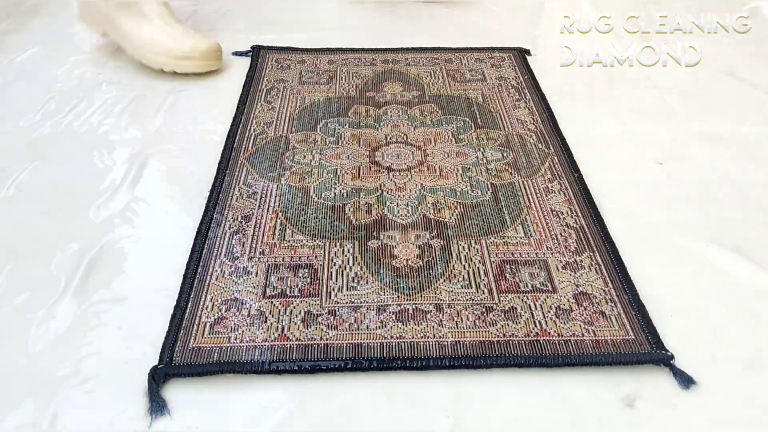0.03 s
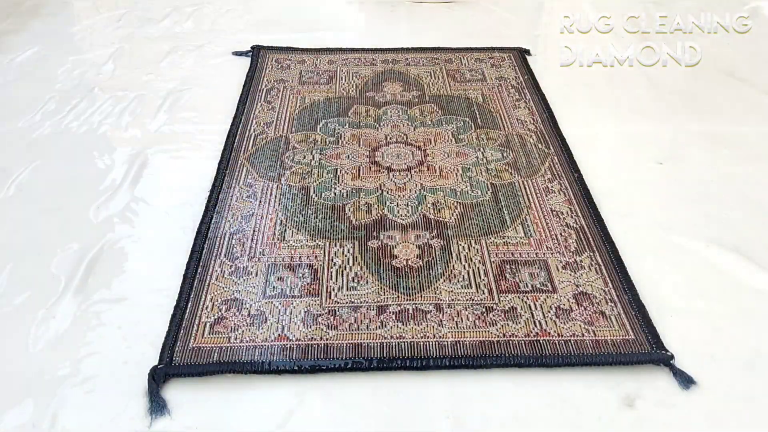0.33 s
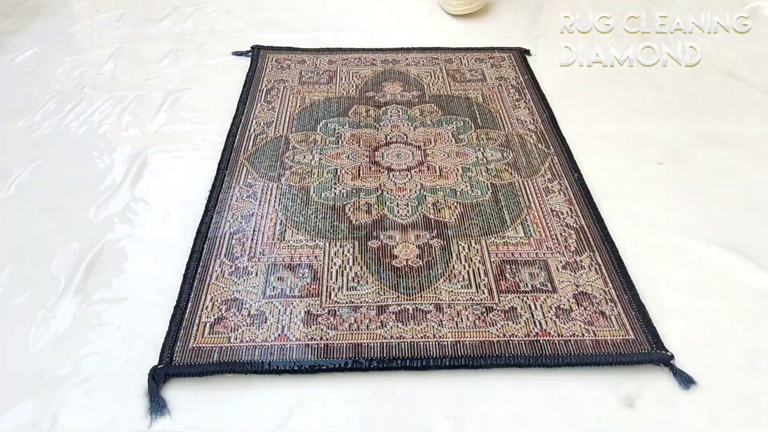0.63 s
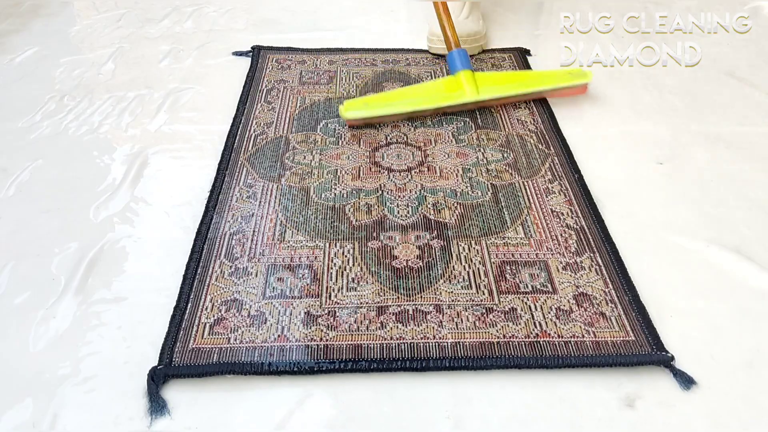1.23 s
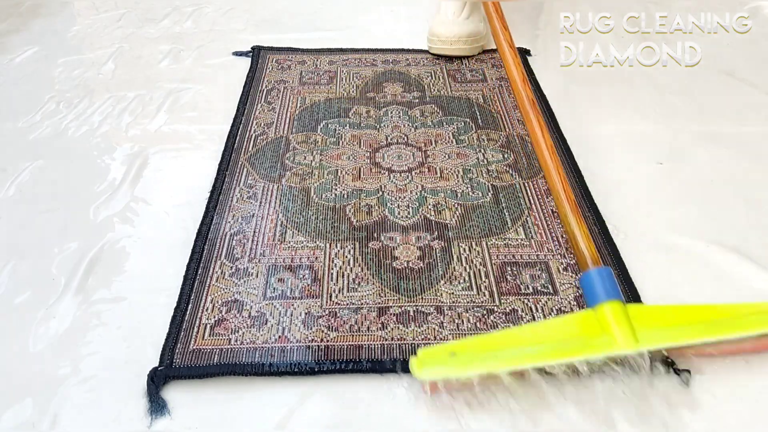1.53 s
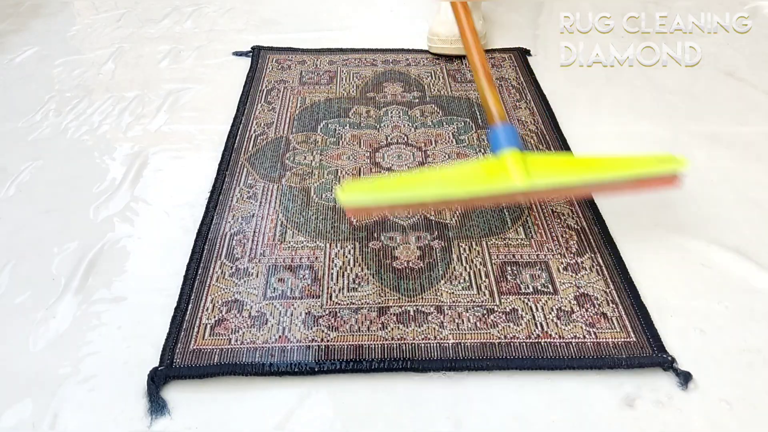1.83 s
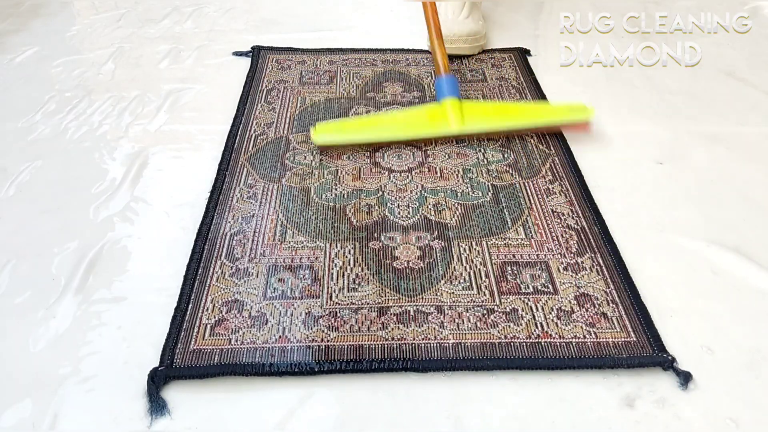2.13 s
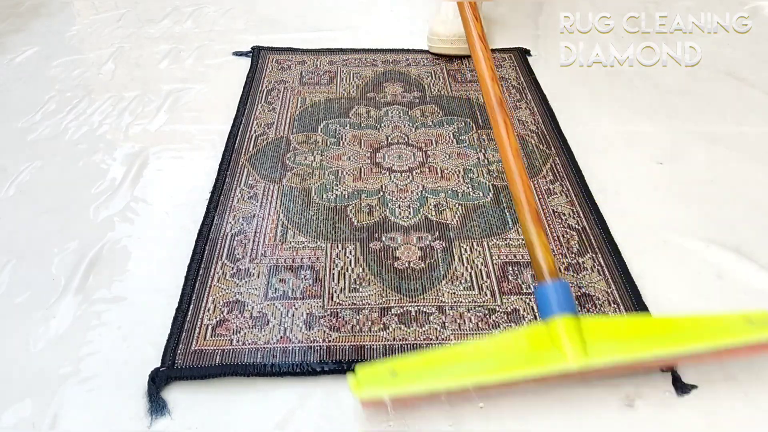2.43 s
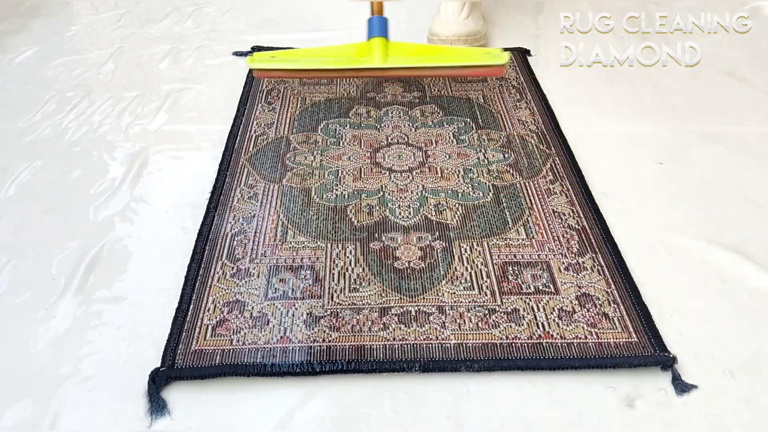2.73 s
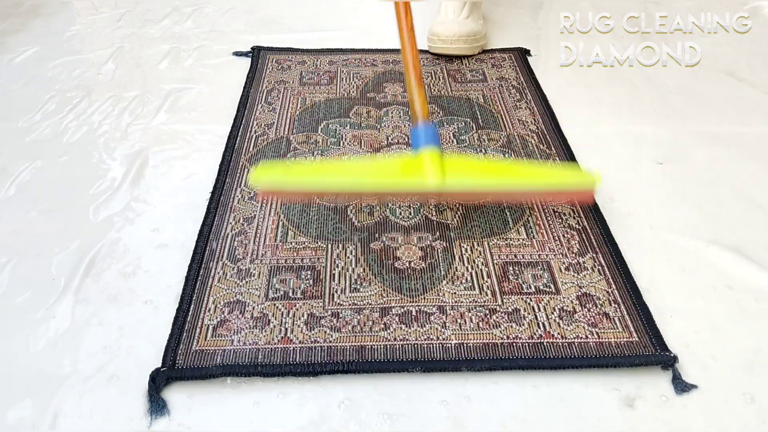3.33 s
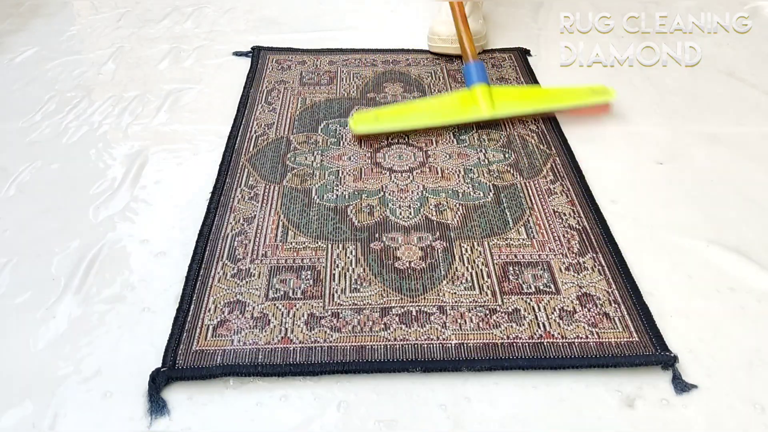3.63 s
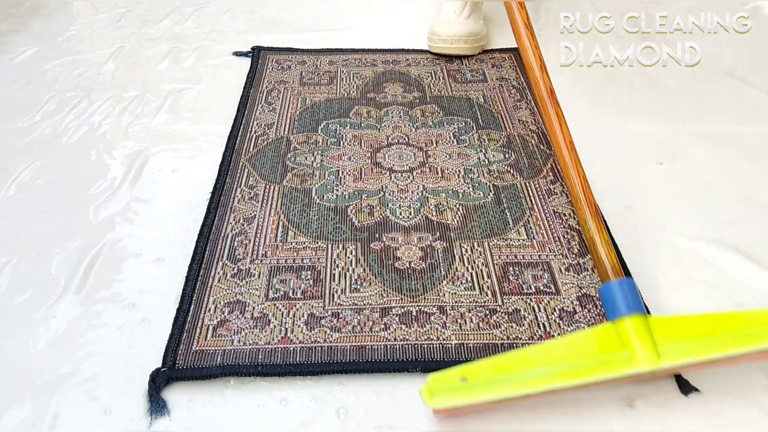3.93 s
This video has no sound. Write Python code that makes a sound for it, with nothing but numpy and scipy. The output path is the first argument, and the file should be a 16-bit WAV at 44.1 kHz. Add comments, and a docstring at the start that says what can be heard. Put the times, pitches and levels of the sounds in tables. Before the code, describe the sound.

Wet, hissy swipes of a squeegee over a soaked rug, with light taps and spattering water.

```python
"""A rubber squeegee works a wet rug on a wet floor in a hard-walled room, while a spinning machine hums.
The blade lands with wet slaps and pushes at 0.9 s and 1.8 s: it flicks the wet pile (hiss), its rubber
slips (rasp) and its hollow head drones. After each push, water drips and spatters on the floor.
At 2.5 s it is pulled back, scraping roughly, and knocks at the rug's edge at 2.8 s.
One more slap starts the last push at 3.3 s."""
import sys
import numpy as np
from scipy import signal
from scipy.fft import rfft, irfft
from scipy.io import wavfile

SR = 44100
rng = np.random.default_rng(int(sys.argv[2]) if len(sys.argv) > 2 else 0)


def persist_wave(psi):
    """Save psi, clipped to +-1, as 16-bit WAV."""
    counts = np.round(np.clip(psi, -1, 1) * 32767).astype(np.int16)
    wavfile.write(sys.argv[1], SR, np.atleast_2d(counts).T)


N = 176400
TIME = np.arange(N) / SR
FLICKS_PER_S, FLICK_SPREAD_DB = 14000, 3.5  # "spread" is how much the snaps vary in size
SLIPS_PER_S, SLIP_SPREAD_DB = 4000, 0.5


# How each stroke swells and fades, before its own gains: t/s, hiss level/dB, rasp level/dB
PUSH_1 = [(0.915, -56, -53), (0.943, -35, -43), (1.019, -29.5, -41), (1.119, -26.5, -36.5),
          (1.201, -24.5, -37), (1.317, -35, -38.5), (1.361, -28.5, -45.5), (1.47, -52, -56)]
PUSH_2 = [(1.81, -50, -50), (1.816, -36, -45), (1.872, -25.5, -38), (1.986, -21.5, -33.5),
          (2.06, -22, -38.5), (2.07, -24, -33.5), (2.13, -45, -52.5), (2.15, -38, -54)]
PULL = [(2.54, -37.5, -45), (2.586, -26.5, -34.5), (2.616, -26, -26), (2.688, -23, -23.5),
        (2.8, -22.5, -28), (2.81, -23.5, -26.5), (2.822, -22, -29), (2.848, -40, -41.5), (2.88, -41.5, -46)]
PUSH_3 = [(3.295, -41, -43.5), (3.333, -29, -38.5), (3.413, -23, -34.5), (3.523, -18.5, -35.5),
          (3.601, -25.5, -44.5), (3.625, -34, -40), (3.69, -53, -68)]
# Tone of the rubber when pushed and when pulled: f/Hz, level/dB
PUSH_RASP = [(150, -28.5), (290, 3.5), (400, -7.5), (750, 1), (1200, 2), (1650, 1), (2400, 1.5),
             (3100, -0.5), (4100, -1), (7000, -5.5), (15000, -9)]
PULL_RASP = [(150, -29), (250, -25), (345, -6), (750, -5), (1000, -1.5), (1400, -2), (1750, -5),
             (2150, -3.5), (2800, -6), (3300, -14), (3900, -15.5), (4800, -9.5), (7000, -37), (12000, -30)]
def strokes():
    """Push, push, pull back, push, each with a fine, patchy treble crackle of short random pings."""
    crackle = amp(-9.5) * pings(per_s=68, low_hz=4780, high_hz=15240, width_hz=130, count=22)
    return (stroke(PUSH_1, PUSH_RASP, crackle, hiss_db=-7.5, rasp_db=3.0, left_db=0.5, drift_db=-0.9)
            + stroke(PUSH_2, PUSH_RASP, crackle, hiss_db=-4.5, rasp_db=3.5, left_db=0.2, drift_db=0.4)
            + stroke(PULL, PULL_RASP, crackle, hiss_db=-7.0, rasp_db=-1.0, left_db=0.4, drift_db=-0.6)
            + stroke(PUSH_3, PUSH_RASP, crackle, hiss_db=-5.5, rasp_db=1.5, left_db=0.75, drift_db=0.0))


# Tone of the flicked wet fibres and of larger bubbles popping among them: f/Hz, level/dB
PILE_HISS = [(1500, -32), (4200, -9), (5500, -2), (6200, 0.5), (7500, 2.5), (10000, 2), (13000, 0),
             (16000, 1)]
BUBBLE_POPS = [(400, -4.5), (1200, 6.5), (3000, 0), (6000, 27.5), (10000, -5), (16000, -6)]
def stroke(curve, rasp_tone, crackle, hiss_db, rasp_db, left_db, drift_db, fade_s=0.006):
    """The blade flicks wet fibres and pops a few larger bubbles; its rubber slips unevenly."""
    times, *levels = np.transpose(curve)
    contact = np.clip(np.minimum(TIME - times[0], times[-1] - TIME) / fade_s + 1, 0, 1)
    wobble_db = 0.83 * np.interp(TIME, np.arange(N) * 0.012, rng.standard_normal(N))  # new every 12 ms
    pressure = contact * amp(wobble_db)
    hiss, rasp = (pressure * amp(np.interp(TIME, times, level)) for level in levels)
    flicks = unit(colour(clicks(FLICKS_PER_S, FLICK_SPREAD_DB), PILE_HISS))
    pops = amp(-11.5) * unit(colour(clicks(per_s=300, spread_db=7.5), BUBBLE_POPS))
    slips = unit(colour(clicks(SLIPS_PER_S, SLIP_SPREAD_DB), rasp_tone))
    sound = amp(hiss_db) * hiss * (flicks + crackle + pops) + amp(rasp_db) * rasp * slips
    lean_db = left_db + drift_db * np.interp(TIME, [times[0], times[-1]], [0, 1])
    return sound * amp([lean_db, -lean_db])


# Drones where the blade is pressed hardest: peak t/s, f/Hz, level/dB, rise/s, fade/s
HEAD_DRONES = [(.99, 470, -38.5, 0.0094, 0.11), (1.04, 444, -36.5, 0.03, 0.43),
               (1.11, 475, -38.5, 0.037, 0.33), (1.749, 470, -39.5, 0.016, 0.17),
               (1.881, 548, -34.5, 0.036, 0.56), (1.98, 634, -45, 0.1, 0.76),
               (2.662, 396, -30, 0.095, 0.66), (2.78, 415, -26.5, 0.047, 0.22),
               (3.43, 620, -39.5, 0.092, 0.48)]
def drones():
    """The slipping rubber makes the squeegee's hollow head ring."""
    return sum(amp(db) * burst(t, rise, fade) * swarm(hz, width_hz=244)
               for t, hz, db, rise, fade in HEAD_DRONES)


# Water squeezed out under the blade: peak t/s, f/Hz, width/Hz, level/dB, rise/s, fade/s
SQUELCHES = [(1.29, 1130, 400, -38.5, 0.017, 0.19), (1.325, 1460, 650, -39.5, 0.023, 0.08),
             (2.68, 2100, 930, -23, 0.033, 0.25), (2.765, 2150, 950, -27.5, .025, 0.17),
             (3.6, 2240, 1320, -39, 0.037, 0.082)]
def squelches():
    """Small bubbles swarm where the blade presses water out of the rug."""
    return sum(amp(db) * burst(t, rise, fade) * swarm(hz, width)
               for t, hz, width, db, rise, fade in SQUELCHES)


# Wet slaps of blade and boots: t/s, splash level/dB, pat level/dB, rise/s, fade/s, left over right/dB
SLAPS = [(0.598, -46.5, -48, .005, 0.046, 6), (.605, -42, -65, .002, 0.12, 0),
         (.78, -53.5, -53, 0.026, .26, 0), (0.8245, -37.5, -36.5, .001, .022, 5.5),
         (0.8272, -40.5, -44.5, .0005, 0.069, -7), (1.74, -38, -40.5, 0.0072, 0.12, 1),
         (1.7494, -29, -42, 0.0008, 0.028, 5), (1.761, -45, -55, 0.0037, .15, -2),
         (1.815, -42, -47, .002, 0.07, -4), (2.51, -60, -37, .0022, 0.071, -7),
         (2.5168, -35, -29.5, 0.00054, 0.036, 2.5), (2.53, -43, -51, .001, 0.025, 1),
         (2.538, -43, -49, 0.0095, 0.21, -3), (3.2671, -32.5, -40, .0005, 0.018, 1),
         (3.2687, -33.5, -34.5, 0.00067, .02, 13), (3.284, -41, -39.5, 0.0096, 0.1, -5)]
# Tone of the bright splash and of the low pat: f/Hz, level/dB
SPLASH_TONE = [(800, -37), (2500, 8.5), (5000, 12.5), (9000, 7.5), (16000, 3.5)]
PAT_TONE = [(100, 11.5), (280, -4), (460, 7.5), (750, -1), (1300, 4.5), (2800, -1.5), (5000, -14.5),
            (15000, -70)]
def slaps():
    """Each landing is a splash of fine drops over a short hollow pat."""
    splash, pat = np.zeros((2, 2, N))
    for t, splash_db, pat_db, rise, fade, side_db in SLAPS:
        shape = amp([[side_db / 2], [-side_db / 2]]) * burst(t, rise, fade)
        splash += amp(splash_db) * shape
        pat += amp(pat_db) * shape
    drops = unit(colour(clicks(FLICKS_PER_S, FLICK_SPREAD_DB), SPLASH_TONE))
    return splash * drops + pat * unit(colour(noise(N), PAT_TONE))


# Knocks on the head: t/s, level/dB
KNOCKS = [(2.8097, -12), (2.813, -19.5), (2.8292, -26), (2.978, -33)]
# Notes that the head and handle ring with: f/Hz, level/dB added to the knock's, fade/s
HEAD_NOTES = [(81, -16, 0.073), (191, -16.5, 0.14), (327, 1, 0.0065), (485, -5, 0.012), (830, -9.5, 0.027),
              (935, -10, 0.012), (1240, -25, 0.0072), (1450, -20, 0.013), (1663, -13.5, 0.071)]
def knocks():
    """Head and handle ring briefly as the blade snaps over the rug's edge and is swung back."""
    out = np.zeros(N)
    for t, db in KNOCKS:
        for hz, note_db, fade in HEAD_NOTES:
            out += amp(db + note_db) * burst(t, 0.0007, fade) * np.sin(2 * np.pi * hz * (TIME - t))
    return np.array([out, out])


# Showers of drops: peak t/s, level/dB, rise/s, fade/s
SPATTERS = [(.02, -57, 0.039, 0.24), (1.53, -55, 0.05, 0.25), (2.212, -42, 0.045, 0.23),
            (2.94, -49, 0.061, 0.11), (2.989, -37, 0.042, 0.18)]
# Tone of the drops: f/Hz, level/dB
SPATTER_TONE = [(300, -53), (1000, 2), (2500, -6.5), (4500, 7.5), (7000, 4.5), (11000, 0.5), (16000, -1)]
def spatters():
    """Pushed water lands on the floor as many tiny drops."""
    shower = sum(amp(db) * burst(t, rise, fade) for t, db, rise, fade in SPATTERS)
    return shower * unit(colour(clicks(per_s=3800, spread_db=4.5), SPATTER_TONE))


# Single drips: t/s, f/Hz, level/dB, left over right/dB
DRIPS = [(1.4865, 9900, -37.5, 4), (1.5175, 10850, -46, 1), (1.5265, 9040, -38.5, -4),
         (1.5325, 9130, -45, -4), (1.5628, 11100, -48, 6), (1.7245, 10500, -37, -4),
         (2.158, 10600, -41, -3), (2.1707, 8630, -28.5, -5), (2.189, 2890, -25, 2), (2.818, 11000, -35, -2),
         (2.926, 10400, -39, 5)]
def drips(rise_s=0.00018, fade_s=0.0057, glide_per_s=61):
    """Each drip traps a bubble that rings for an instant, rising in pitch."""
    out = np.zeros((2, N))
    for t, hz, db, side_db in DRIPS:
        pitch = hz * (1 + glide_per_s * np.clip(TIME - t, 0, fade_s))
        ring = np.sin(2 * np.pi * (np.cumsum(pitch) / SR + rng.random((2, 1)) / 2))
        out += amp([[db + side_db / 2], [db - side_db / 2]]) * burst(t, rise_s, fade_s) * ring
    return out


def seep():
    """Water seeps from the rug in a faint, bubbling trickle that dies away."""
    return amp(-61 - 2.5 * TIME) * pings(per_s=14, low_hz=546, high_hz=1930, width_hz=70, count=10)


# How fast the machine spins: t/s, speed/(turns per s)
SPIN_SPEED = [(0, 16.25), (.8, 16.37), (1.4, 16.26), (2.1, 16.04), (2.8, 15.95), (4, 16.03)]
# Its hum, one row each for 5, 6, 7... times that speed: level/dB, peak t/s, half length/s
HUMS = [(-64, 2.7, 3), (-56, 0.93, 3.1), (-53, 2.06, 2.1), (-53.5, 2.67, 1.2), (-49, 1.05, 1.35),
        (-61, 1.6, 2.4), (-60, 2.6, 2.2)]
def machine_hum():
    """A spinning machine hums at whole multiples of its speed."""
    turns = np.cumsum(np.interp(TIME, *np.transpose(SPIN_SPEED))) / SR
    return sum(swell(multiple * turns, db, t, half) for multiple, (db, t, half) in enumerate(HUMS, 5))


# Tone of the room's background noise: f/Hz, level/dB
AIR_TONE = [(15, 0), (28, -4), (38, -4), (52, 3), (70, -3), (120, -3.5), (180, -7), (220, -12.5), (280, -9),
            (350, -13), (500, -15), (1000, -23), (2000, -25), (4000, -28.5), (6500, -30), (9500, -35),
            (15000, -35.5)]
def room_tone():
    """Low rumble and faint air, with a deep note that swells near the end."""
    deep_note = swell(50.3 * TIME, db=-47, peak_s=3.76, half_s=0.3)
    return deep_note + amp(-46.5) * unit(colour(noise(N), AIR_TONE, size=16384))


# How long the room takes to fall by 60 dB: f/Hz, fade/s
ROOM_FADE = [(100, 0.36), (400, 0.44), (1500, 0.22), (5000, 0.26), (10000, 0.17), (16000, 0.052)]
def room(x, tail_db, echo_db):
    """Hard walls add four quick echoes and a tail in which each pitch dies at its own speed."""
    hz, t, bands = signal.stft(noise(24000), SR, nperseg=256)
    decay = np.exp(-np.log(1000) * t / read(ROOM_FADE, hz)[:, None])
    tail = signal.istft(bands * decay, SR)[1]
    tail = amp(tail_db) * tail / np.linalg.norm(tail[0])
    for delay_s in rng.uniform(0.002, 0.016, 4):
        tail[:, int(SR * delay_s)] += amp(echo_db)
    return x + signal.fftconvolve(x, tail, axes=1)[:, :N]


# How alike left and right sound: f/Hz, likeness from 0 to 1
LIKENESS = [(30, 0.74), (150, 0.88), (400, 0.84), (700, 0.52), (1400, 0.11), (2400, 0.42), (4200, 0.057),
            (6500, 0), (16000, 0)]
def stereo(pair):
    """Blends two unrelated signals: alike in the bass, apart in the treble."""
    hz = np.fft.rfftfreq(pair.shape[1], 1 / SR)
    angle = np.arcsin(np.clip(read(LIKENESS, hz), 0, 1)) / 2
    spectra = rfft(pair)
    return irfft(np.cos(angle) * spectra + np.sin(angle) * spectra[::-1], pair.shape[1])


def noise(samples):
    """An even stereo hiss."""
    return stereo(rng.standard_normal((2, samples)))


def clicks(per_s, spread_db):
    """A stereo stream of tiny snaps of random size."""
    size = amp(spread_db * np.minimum(rng.exponential(1, (2, N)), 4))
    return stereo(size * rng.choice([-1, 1], (2, N)) * (rng.random((2, N)) < per_s / SR))


def pings(per_s, low_hz, high_hz, width_hz, count):
    """Short pings of many pitches; each pitch rings at random, about per_s times a second."""
    pitches = np.geomspace(low_hz, high_hz, count)
    return unit(sum(resonate(clicks(per_s, spread_db=4.5), hz, width_hz) for hz in pitches))


def swarm(hz, width_hz):
    """Dense random snaps, filtered twice so that they crowd around one pitch."""
    snaps = clicks(SLIPS_PER_S, SLIP_SPREAD_DB)
    return unit(resonate(resonate(snaps, hz, width_hz), hz, width_hz))


def resonate(x, hz, width_hz):
    """Makes x ring at one pitch; a smaller width rings longer."""
    decay = np.exp(-np.pi * width_hz / SR)
    return 2 * signal.lfilter([1 - decay], [1, -decay * np.exp(2j * np.pi * hz / SR)], x).real


def burst(peak_s, rise_s, fade_s):
    """A loudness shape that grows to its peak, then falls by 60 dB in fade_s."""
    before = (np.minimum(TIME - peak_s, 0) / rise_s) ** 2
    after = np.log(1000) * np.maximum(TIME - peak_s, 0) / fade_s
    return np.exp(-np.minimum(before + after, 50))


def swell(cycles, db, peak_s, half_s):
    """A clean tone that slowly grows and fades."""
    shape = np.exp(-((TIME - peak_s) / half_s) ** 2)
    return amp(db) * np.sqrt(2) * shape * np.sin(2 * np.pi * (cycles + rng.random()))


def colour(x, tone, size=4096):
    """Gives x the tone in a table, with a filter that never rings ahead of the sound."""
    log_gain = np.log(amp(read(tone, abs(np.fft.fftfreq(size, 1 / SR)))))
    taps = np.fft.ifft(np.exp(np.conj(signal.hilbert(log_gain)))).real[:size // 2]
    return signal.oaconvolve(np.atleast_2d(x), taps[None], axes=1)[:, :N]


def read(table, hz):
    """Reads between a table's rows, with octaves evenly spaced."""
    f, value = np.transpose(table)
    return np.interp(np.log(hz + 1), np.log(f), value)


def amp(db):
    """Turns decibels into a gain."""
    return 10 ** (np.asarray(db) / 20)


def unit(x):
    """Scales x to an average strength (rms) of 1."""
    return x / np.sqrt(np.mean(x ** 2) + 1e-20)


def scene():
    """Squeegee and water echo in the room, over the hum and rumble."""
    rug = strokes() + drones() + squelches()
    water = slaps() + spatters() + seep()
    return (room(rug, tail_db=-8, echo_db=-14) + room(water, tail_db=-4, echo_db=-15.5)
            + room(drips(), tail_db=-21, echo_db=-10.5) + room(knocks(), tail_db=-8, echo_db=-19)
            + machine_hum() + room_tone())


# Tone of the left and right microphone openings: f/Hz, level/dB
LEFT_OPENING = [(100, 0.8), (2500, 0.5), (6000, -1), (7600, 1.5), (9000, 8), (10000, 10), (11100, 16),
                (12500, 11), (14000, 5), (16000, 0.5)]
RIGHT_OPENING = [(100, -0.2), (2500, 0.8), (6000, -0.5), (7500, 7), (8650, 14.5), (10000, 9), (11300, 3.5),
                 (12500, 0.5), (14000, 2.5), (16000, -22)]
def record(dry):
    """Each microphone opening rings in the treble; the very highest pitches are then cut off."""
    heard = np.vstack([colour(dry[0], LEFT_OPENING), colour(dry[1], RIGHT_OPENING)])
    low_pass = signal.firwin(511, cutoff=15550, window=("kaiser", 9), fs=SR)
    return signal.oaconvolve(heard, low_pass[None], "same")


dry = scene()
out = record(dry)
persist_wave(out)
```